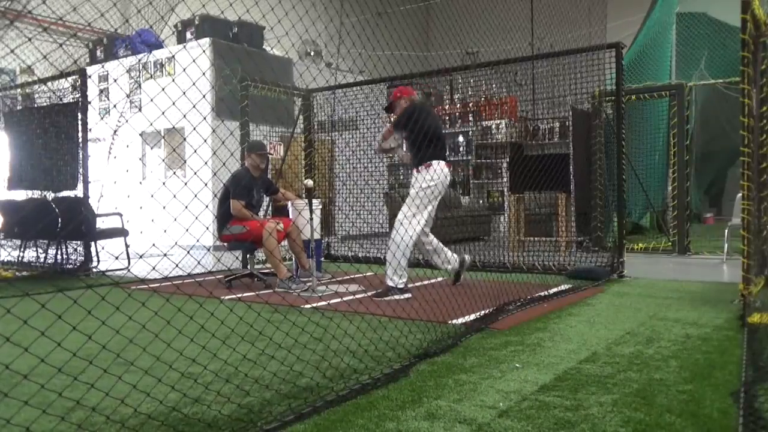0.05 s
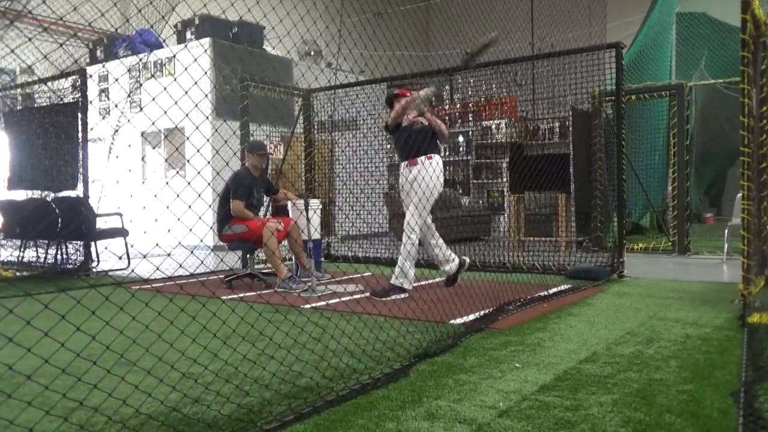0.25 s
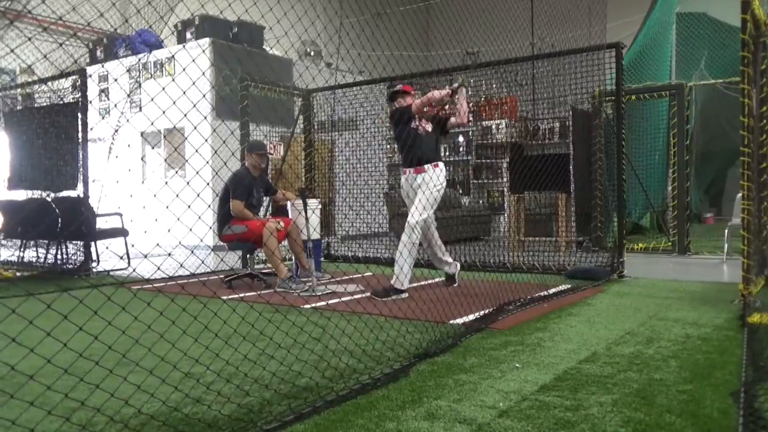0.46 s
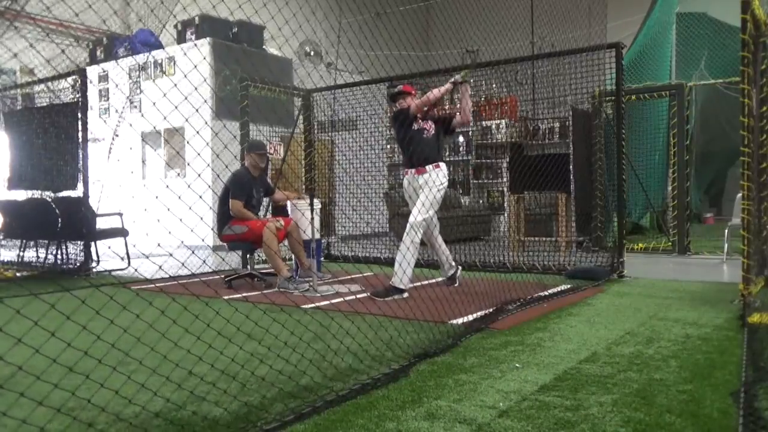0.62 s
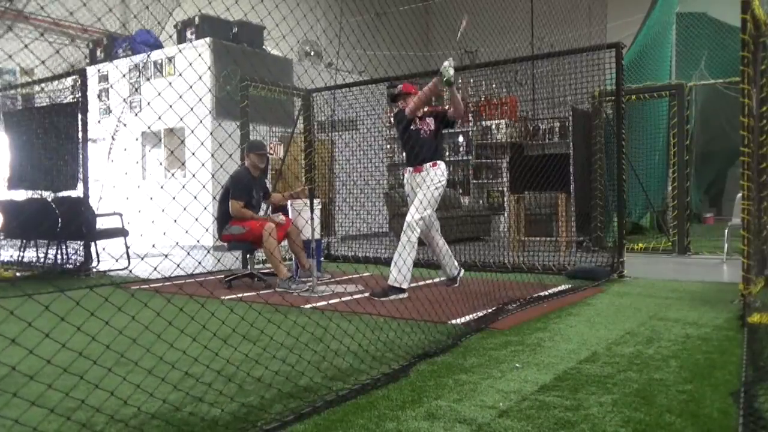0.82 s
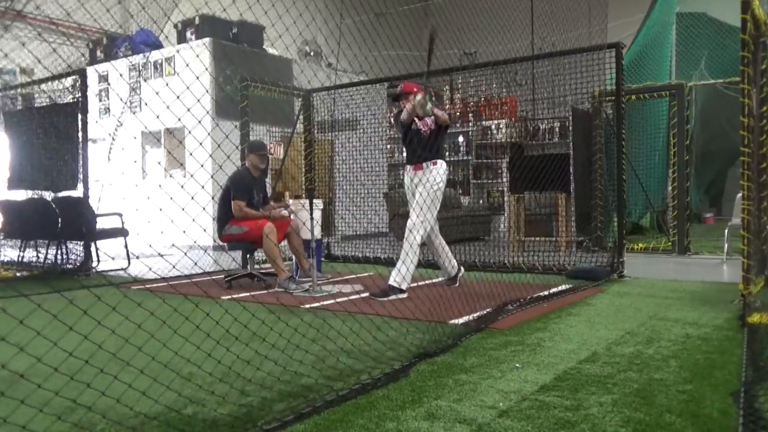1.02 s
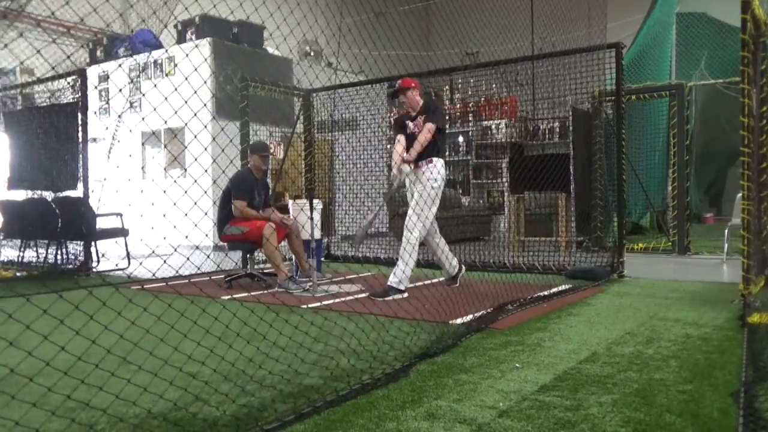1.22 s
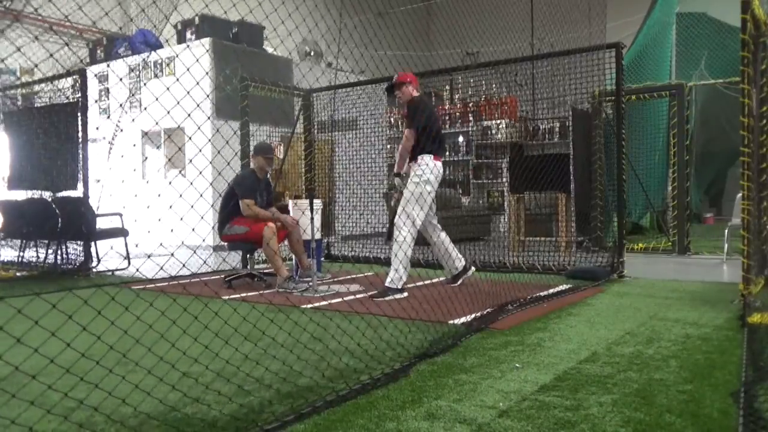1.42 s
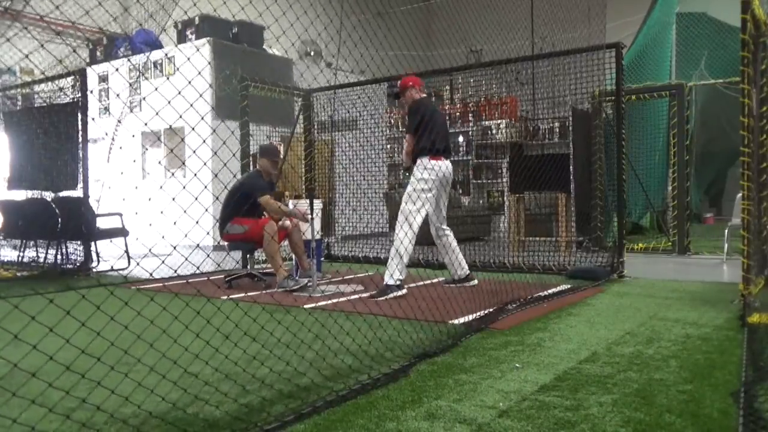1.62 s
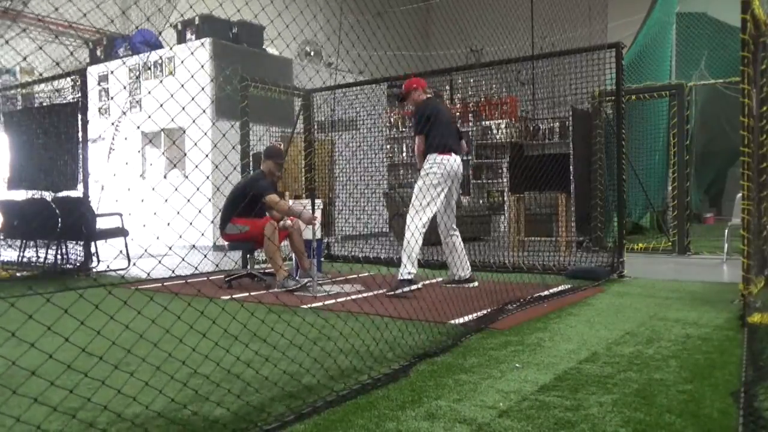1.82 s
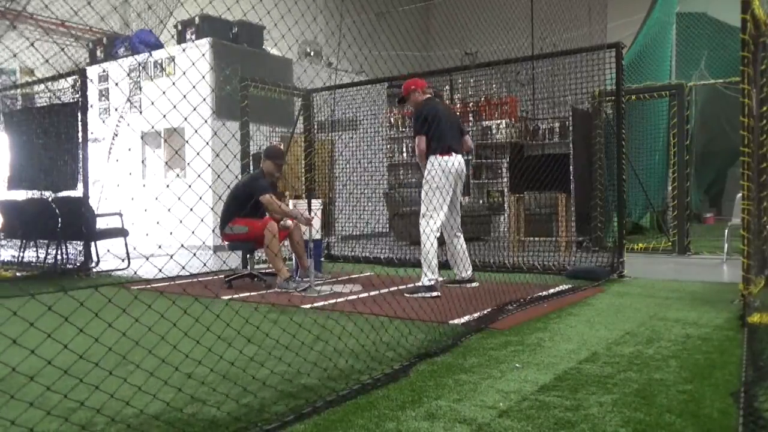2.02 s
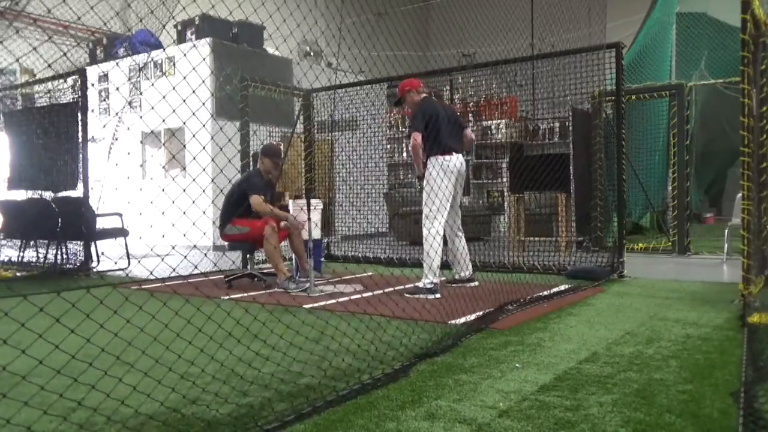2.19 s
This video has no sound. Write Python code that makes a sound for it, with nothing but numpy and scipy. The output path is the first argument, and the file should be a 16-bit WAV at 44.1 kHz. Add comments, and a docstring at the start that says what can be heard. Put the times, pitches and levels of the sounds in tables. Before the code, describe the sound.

A bat cracks a baseball in an echoing indoor cage, followed by a dull thud.

```python
"""Bat crack in an indoor batting cage

Clothes rustle and air puffs with the swing; a wooden bat cracks a ball in a burst of short modes.
The crack slaps off nearby walls and rings away in a large hard-walled hall; gear ticks, fabric swishes.
Later a ball drops through slack netting onto turf close on the left, rattles the frame and bounces.
Ventilation rumbles throughout."""
import sys
import numpy as np
from scipy import signal
from scipy.fft import rfft, irfft, next_fast_len
from scipy.io import wavfile
from scipy.ndimage import uniform_filter1d

SR = 44100
rng = np.random.default_rng(int(sys.argv[2]) if len(sys.argv) > 2 else 0)


def store_wav(level_fs):
    """Save 16-bit WAV to argv[1]."""
    pcm = np.round(np.clip(np.atleast_2d(level_fs), -1, 1) * 32767)
    wavfile.write(sys.argv[1], SR, pcm.T.astype(np.int16))


N = 103635

CRACK_S, HALL_RISE_S, DROP_PAN_DB = 0.2399, 0.037, 2.5


def amp(db):
    """Decibels to gain."""
    return 10 ** (np.asarray(db) / 20)


def curve(points, hz):
    """Interpolate (f/Hz, value) points over log frequency."""
    f, values = np.array(points, float).T
    return np.interp(np.log(np.maximum(hz, 1)), np.log(f), values)


def since(start_s):
    """Seconds since start_s, zero before."""
    return np.maximum(np.arange(N) / SR - start_s, 0)


def decay(t, t60_s):
    """Exponential fall, 60 dB per t60_s."""
    return np.exp(-np.log(1000) * t / t60_s)


def fade(start_s, t60_s, rise_s=0.000067):
    """Envelope: quick rise, exponential decay."""
    out = np.zeros(N)
    span = slice(max(int(start_s * SR) + 1, 0), min(int((start_s + 1.5 * t60_s) * SR), N))
    t = np.arange(span.start, span.stop) / SR - start_s
    out[span] = (1 - np.exp(-t / rise_s)) * decay(t, t60_s)
    return out


def swell(at_s, sigma_s):
    """Gaussian envelope."""
    return np.exp(-.5 * ((np.arange(N) / SR - at_s) / sigma_s) ** 2)


def pan(x, db):
    """Left louder than right by db."""
    return x * amp(np.array([[db], [-db]]) / 2)


def cut(x, hz, kind="low"):
    """Second-order low-pass or high-pass."""
    return signal.lfilter(*signal.butter(2, min(hz, .45 * SR), kind, fs=SR), x)


def add(out, x, start_s):
    """Mix x into out at start_s."""
    span = out[:, int(start_s * SR):][:, :x.shape[-1]]
    span += x[..., :span.shape[1]]


def ring(modes):
    """Sum of damped sine modes."""
    t = np.arange(SR // 2) / SR
    return sum(amp(db) * np.sin(2 * np.pi * hz * t) * decay(t, t60_s) for hz, db, t60_s in modes)


def noise(colour, resonances=()):
    """Coloured stereo noise, mid at unit RMS, as wide as the hall."""
    # side re mid: f/Hz, level/dB
    stereo_width = [(100, -43), (300, -16), (1000, -9), (2300, -8.5), (4000, -7.5), (7000, -21)]
    size = next_fast_len(N, True)
    hz = np.arange(size // 2 + 1) * SR / size
    peaks = sum(amp(db) / (1 + (2 * (hz - f) / width_hz) ** 2) for f, width_hz, db in resonances)
    gain = amp(curve(colour, hz)) * (1 + peaks)
    mid, side = rfft(rng.standard_normal((2, size))) * gain / np.sqrt(np.mean(gain ** 2))
    side = side * amp(curve(stereo_width, hz))
    return irfft(np.array([mid + side, mid - side]), size)[:, :N]


def hall(x, start_s):
    """Shape noise into the hall's reverberation; treble dies first."""
    # reverberation time: f/Hz, T60/s
    hall_t60 = [(100, 1.6), (300, 2.62), (700, 2.08), (1500, 2.16), (2800, 1.72), (4500, 1.5), (7000, 1.01),
                (10000, 0.58), (16000, 0.29)]
    hz, t, frames = signal.stft(x, SR, nperseg=512)
    frames = frames * decay(np.maximum(t - start_s, 0), curve(hall_t60, hz)[:, None])
    return signal.istft(frames, SR)[1][:, :N] * (1 - np.exp(-since(start_s) / HALL_RISE_S))


def ventilation(waver_db=3.5):
    """Steady rumble and hiss with wavering fan lines."""
    # air noise spectrum: f/Hz, level/dB
    colour = [(15, -33), (25, -0.5), (91, 0), (230, -11), (322, -16), (482, -13), (582, -19.5),
              (848, -16.5), (1600, -21), (2490, -24), (3600, -29), (5580, -34), (9810, -35.5),
              (15500, -44.5)]
    # narrow hiss: f/Hz, width/Hz, added peak/dB
    hiss = [(3310, 116, 2.5)]
    # fan lines: f/Hz, RMS level/dB
    fan_lines = [(96, -50.5), (169, -53), (238, -55)]
    t = since(0)
    out = amp(-38.5) * noise(colour, hiss)
    knots_s = np.linspace(0, t[-1], 20)
    for hz, db in fan_lines:
        waver, phase = (np.interp(t, knots_s, v) for v in rng.standard_normal((2, len(knots_s))))
        out += amp(db + waver_db * waver) * np.sqrt(2) * np.sin(2 * np.pi * hz * t + phase)
    return out


def flaps():
    """Low puffs from swing and swaying net; deep rumble under the swing."""
    # puffs: t/s, sigma/s, level/dB
    puffs = [(0.047, 0.067, -40.5), (0.154, 0.008, -32.5), (0.233, 0.016, -29), (2.195, 0.032, -36),
             (2.305, 0.019, -35.5)]
    # puff spectrum: f/Hz, level/dB
    puff_colour = [(30, 1), (100, 4.5), (200, 4), (320, -7), (550, -19), (1500, -38), (16000, -80)]
    # rumble spectrum: f/Hz, level/dB
    rumble_colour = [(40, 0), (70, -2), (150, -35), (1000, -78)]
    envelope = sum(amp(db) * swell(at_s, sigma_s) for at_s, sigma_s, db in puffs)
    return noise(puff_colour) * envelope + amp(-37.5) * noise(rumble_colour) * swell(0.043, 0.087)


def cloth(swells, colour, grain_db=2):
    """Rubbing fabric: grainy swells of mono noise."""
    grain = uniform_filter1d(rng.standard_normal(N), size=144) * np.sqrt(144)
    envelope = sum(amp(db) * swell(at_s, sigma_s) for at_s, sigma_s, db in swells)
    return noise(colour).mean(axis=0) * amp(grain_db * grain) * envelope


def rustles():
    """Clothes rub during the swing."""
    # rustles: t/s, sigma/s, level/dB
    swells = [(.035, 0.027, -40), (.114, 0.02, -41.5), (.155, 0.047, -42), (.217, 0.021, -38.5)]
    # rustle spectrum: f/Hz, level/dB
    colour = [(150, -2), (500, 1), (1500, 2), (3000, -1.5), (5000, -5.5), (7000, -7.5), (10500, -3.5),
              (13000, -18), (16000, -25)]
    return cloth(swells, colour)


def crack(slap_rise_s=0.00077):
    """Bat on ball: short modes, contact noise and scattered slaps off nearby surfaces."""
    # bat and ball modes: f/Hz, relative level/dB, T60/s
    modes = [(890, -15, 0.035), (1226, -1.5, 0.022), (1870, -9.5, 0.0096), (2700, -3, 0.011),
             (3960, 0, 0.0096), (4300, -6.5, 0.015)]
    # contact noise spectrum: f/Hz, level/dB
    colour = [(100, -23), (280, -11), (500, 0), (1200, 0), (2500, -1), (4000, -7), (5600, -10),
              (9500, -6.5), (13000, -18), (16000, -29)]
    # slaps off floor, frames, walls: delay/s, level/dB, L-R/dB, T60/s, low-pass/Hz
    slaps = [(.006, -11.5, 0, 0.08, 14300), (.0245, -14, -3, 0.061, 11700), (.033, -9.5, 1, 0.04, 17000),
             (.041, -8.5, 0, 0.032, 15900), (.0535, 0, 3, 0.04, 1090), (.069, -7, 16, 0.023, 3930),
             (.103, -12.5, 1, 0.13, 6070), (.139, -14, 9, 0.046, 3250), (.175, -12.5, -1, 0.085, 2820)]
    contact = noise(colour)
    out = amp(-8.5) * contact * fade(CRACK_S, t60_s=0.03)
    add(out, amp(-6.5) * cut(ring(modes), 457, "high"), CRACK_S)
    t = np.arange(SR // 10) / SR
    for k, (delay_s, db, pan_db, t60_s, edge_hz) in enumerate(slaps):
        scatter = contact[:, -(k + 1) * len(t):][:, :len(t)]  # fresh noise per slap
        scatter = scatter * decay(t, t60_s) * (1 - np.exp(-t / slap_rise_s))
        scatter = cut(cut(scatter, edge_hz), 251, "high")
        add(out, amp(db) * pan(scatter, pan_db), CRACK_S + delay_s)
    return out


def crack_reverb():
    """The crack rings briefly in the cage corner and long in the hall."""
    # cage ring spectrum: f/Hz, level/dB
    cage_colour = [(250, -15), (420, -0.5), (600, -3), (800, -1), (1200, -7.5), (1450, -10.5), (2500, -9.5),
                   (5000, -15), (9000, -15), (12000, -35), (16000, -49)]
    # hall ring spectrum: f/Hz, level/dB
    hall_colour = [(270, -10.5), (420, -7), (800, 0.5), (1400, -4.5), (2000, 1.5), (3000, -1.5), (4300, -8),
                   (5500, -11.5), (9000, -13.5), (12000, -17), (16000, -42)]
    # lingering bat tones: f/Hz, width/Hz, added peak/dB
    bat_tones = [(476, 36, -3), (723, 51, -1), (870, 28, 1.5), (1070, 136, 1), (1723, 120, -1.5)]
    near = amp(-10) * noise(cage_colour, bat_tones) * fade(CRACK_S + 0.024, t60_s=0.48, rise_s=0.011)
    weaker_tones = [(hz, width_hz, db - 2) for hz, width_hz, db in bat_tones]
    far = amp(-15.5) * hall(noise(hall_colour, weaker_tones), CRACK_S + 0.017)
    return pan(near, 1) + far


def hollow_tones():
    """Hollow tones swell, slide and fade in the crack's echo."""
    # tones: t/s, sigma/s, f/Hz, slide/(Hz/s), level/dB
    tones = [(.297, 0.03, 660, 1.5, -22), (.33, 0.038, 762, -330, -19), (0.333, 0.029, 458.8, 1497, -23),
             (0.469, 0.028, 836, 600, -25), (0.457, 0.011, 1092, -1500, -25.5),
             (.465, 0.0054, 710, 1.5, -20.5)]
    t, out = since(0), np.zeros(N)
    for at_s, sigma_s, hz, slide_hz_per_s, db in tones:
        cycles = np.cumsum(hz + slide_hz_per_s * (t - at_s)) / SR
        out += amp(db) * swell(at_s, sigma_s) * np.sin(2 * np.pi * (cycles + rng.uniform()))
    return out


def ticks():
    """Small hard taps of gear and cage frame, each with a short bright echo."""
    # taps: t/s, level/dB, echo re tap/dB, L-R/dB
    taps = [(0.549, -25.5, -10.5, 21), (0.5708, -24, -8.5, 18), (.905, -40, -29, 7), (0.93, -43, -31, 10),
            (1.165, -39.5, -33, 4)]
    # tap spectrum: f/Hz, level/dB
    colour = [(300, -26), (1500, -1.5), (3500, 6.5), (5500, -4.5), (7000, -5), (10000, -7.5),
              (13000, -20.5), (16000, -31)]
    envelope = np.zeros((2, N))
    for at_s, db, echo_db, pan_db in taps:
        direct = pan(fade(at_s, t60_s=0.023), pan_db)
        echo = amp(echo_db) * fade(at_s, t60_s=0.6, rise_s=0.014)
        envelope += amp(db) * (direct + echo)
    return noise(colour) * envelope


def swishes():
    """Fabric rubs softly after the swing."""
    # swishes: t/s, sigma/s, level/dB
    swells = [(1.44, 0.025, -46.5), (1.498, 0.019, -46.5), (1.555, 0.058, -49), (2.035, 0.013, -54)]
    # swish spectrum: f/Hz, level/dB
    colour = [(500, -7), (2000, 5.5), (4500, -1), (6000, -2), (9800, 3.5), (12500, -4.5), (16000, -20)]
    return cloth(swells, colour)


def thud_lead_in():
    """A brief low swell of noise leads into the thud."""
    # swell spectrum: f/Hz, level/dB
    colour = [(50, -32), (150, 3), (330, 0.5), (600, -13), (1200, -32), (7000, -85)]
    return amp(-17.5) * pan(noise(colour) * swell(1.846, 0.0072), DROP_PAN_DB)


def thuds(boom_delay_s=0.03455, mono_below_hz=170):
    """Dull close landing and softer bounce, each with echoes and a low boom."""
    # landing, bounce: t/s, level/dB, L-R/dB, low-pass/Hz
    impacts = [(1.8475, -2.5, 9.5, 3200), (2.099, -19.5, -1, 330)]
    # ball on padded turf: f/Hz, relative level/dB, T60/s
    turf_modes = [(148, -14, 0.046), (227, 2, 0.023), (325, -11, 0.028), (920, -11, 0.0096),
                  (1400, -21, 0.0035)]
    # reflections: delay/s, level re impact/dB, L-R/dB
    echoes = [(0.0248, -13.5, 2), (0.044, -15.5, 7), (.051, -18, -4), (0.069, -22, 2)]
    # cage boom: f/Hz, relative level/dB, T60/s
    boom_modes = [(114.6, -25, 0.33), (213, -22.5, 0.21), (274, -30.5, 0.45)]
    out = np.zeros((2, N))
    for at_s, db, pan_db, edge_hz in impacts:
        blow = cut(ring(turf_modes), 69.5, "high")
        blow = cut(cut(blow, edge_hz), edge_hz)
        for delay_s, path_db, path_pan_db in [(0.0017, 0, pan_db)] + echoes:
            add(out, amp(db + path_db) * pan(blow, path_pan_db), at_s + delay_s)
        add(out, amp(db) * ring(boom_modes), at_s + boom_delay_s)
    mid = out.mean(axis=0)
    side = signal.filtfilt(*signal.butter(1, mono_below_hz, "high", fs=SR), out[0] - mid)
    return np.array([mid + side, mid - side])


def frame_clatter():
    """The net pulls on the frame: dry knocks that ring on in cage and hall."""
    # knocks: t/s, level/dB
    knocks = [(1.8815, -13), (1.885, -19.5), (1.8934, -19), (1.913, -24), (1.934, -24)]
    # knock and echo spectrum: f/Hz, level/dB
    colour = [(60, -11), (130, 5), (300, 4), (500, -2), (1000, -4.5), (1800, -6), (2600, -15), (4300, -33),
              (5200, -33), (6200, -47), (16000, -56)]
    start_s = knocks[0][0]
    envelope = sum(amp(db) * fade(at_s, t60_s=0.02) for at_s, db in knocks)
    direct = cut(noise(colour), 500, "high") * envelope
    near = amp(-26) * noise(colour) * fade(start_s, t60_s=0.88)
    far = amp(-39) * hall(noise(colour), start_s)
    return pan(direct + near, DROP_PAN_DB) + far


def scene():
    """Stereo sum: background air, the hit, then the dropping ball."""
    air = ventilation() + flaps()
    hit = rustles() + crack() + crack_reverb() + hollow_tones() + ticks() + swishes()
    drop = thud_lead_in() + thuds() + frame_clatter()
    return air + hit + drop


def record(dry, ceiling=1.65, mono_above_hz=5000, top_hz=15850):
    """Round the loudest peaks, fold the treble to mono, cut the top."""
    rounded = dry / (1 + (dry / ceiling) ** 4) ** 0.25
    mid = rounded.mean(axis=0)
    side = signal.filtfilt(*signal.butter(2, mono_above_hz, fs=SR), rounded[0] - mid)
    low_pass = signal.ellip(10, .2, 80, top_hz, fs=SR, output="sos")
    return signal.sosfilt(low_pass, np.array([mid + side, mid - side]))


dry = scene()
out = record(dry)
store_wav(out)
```